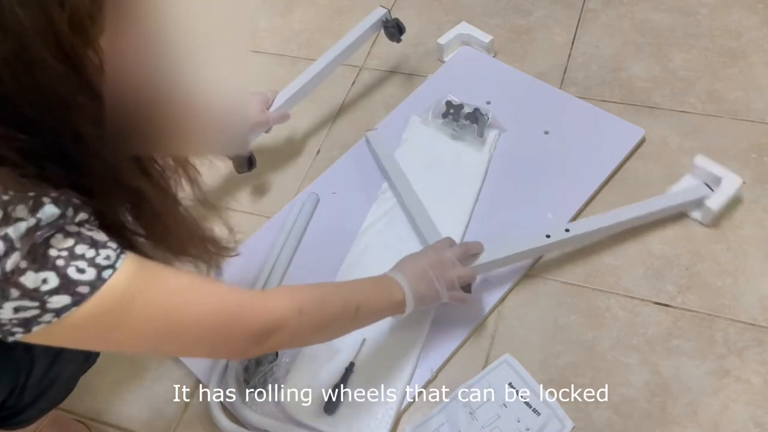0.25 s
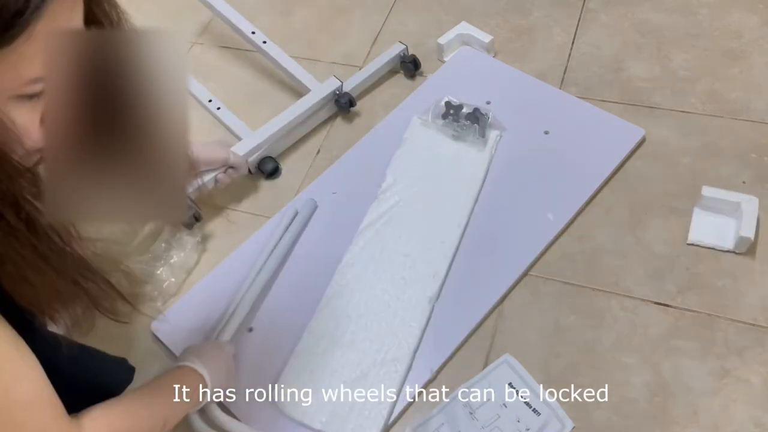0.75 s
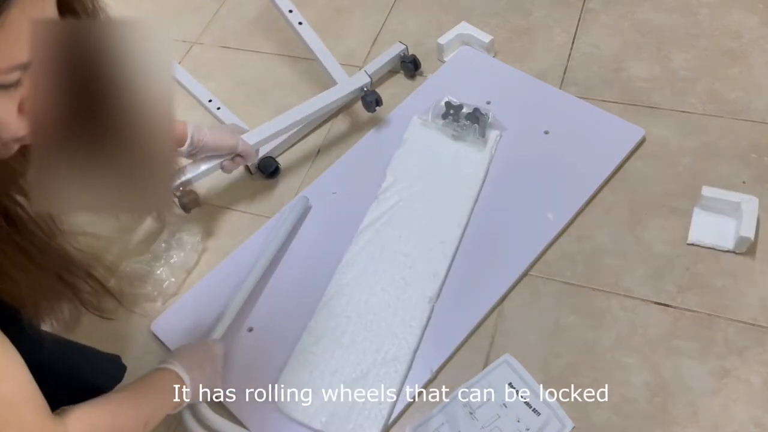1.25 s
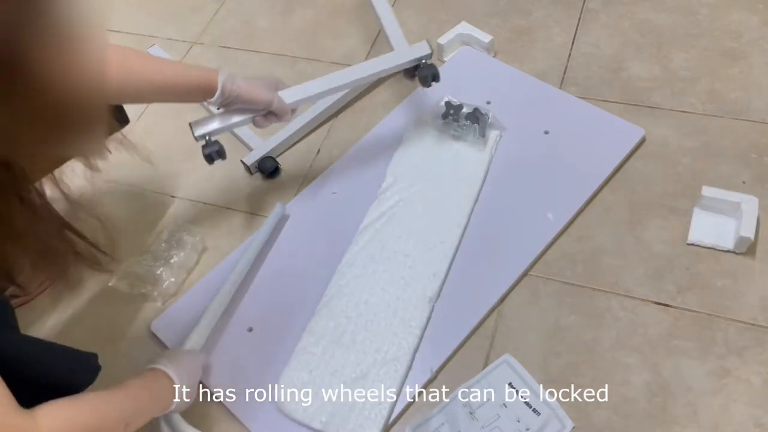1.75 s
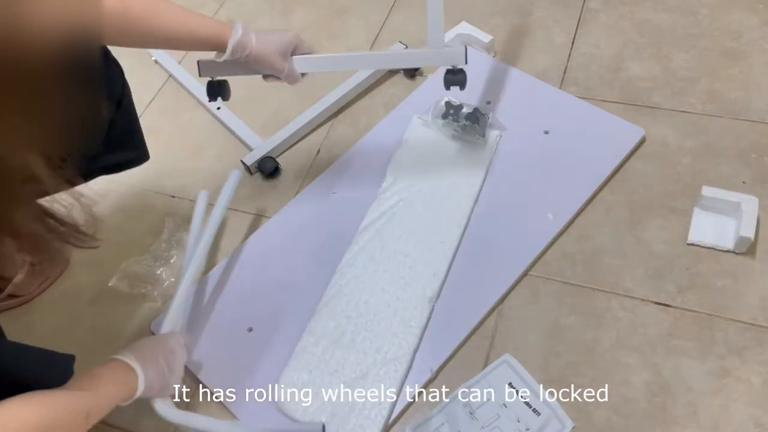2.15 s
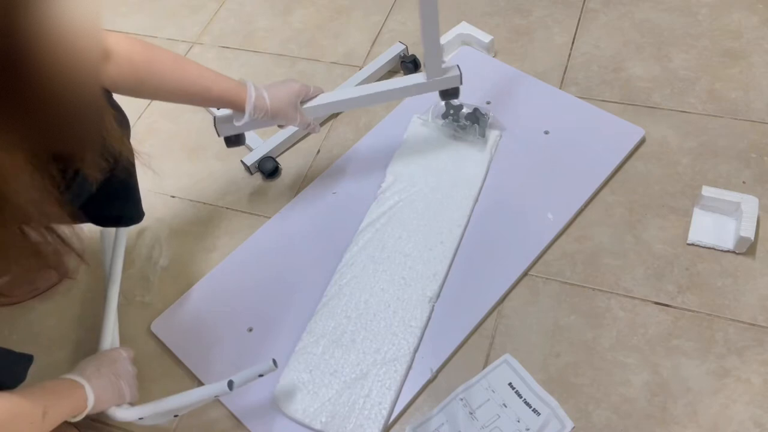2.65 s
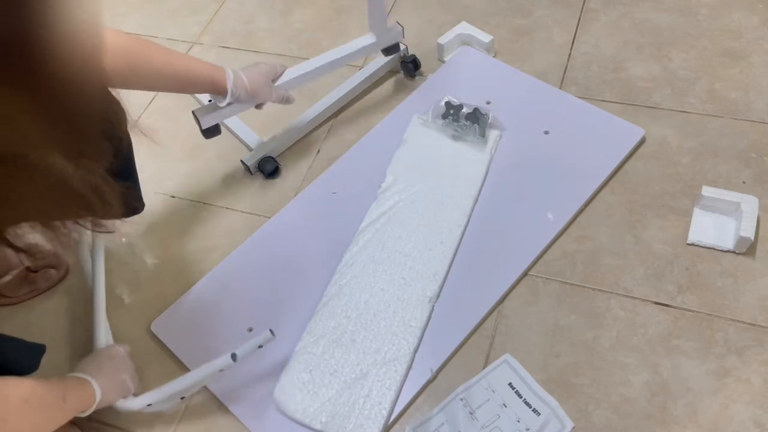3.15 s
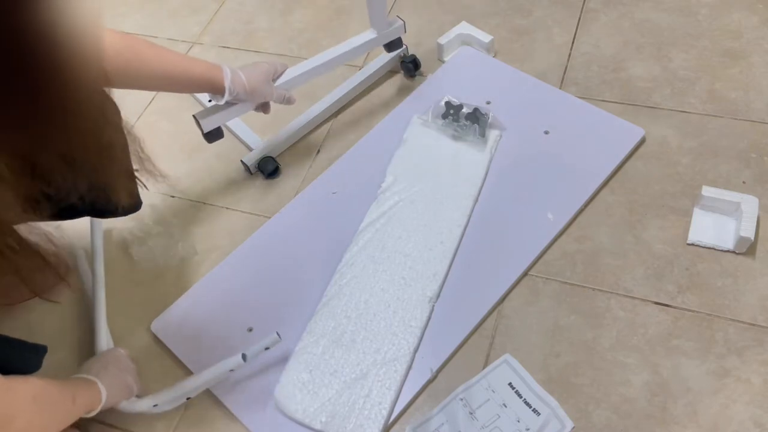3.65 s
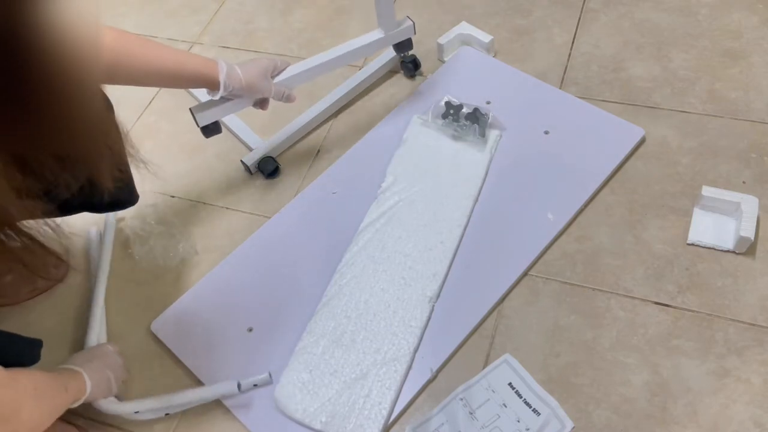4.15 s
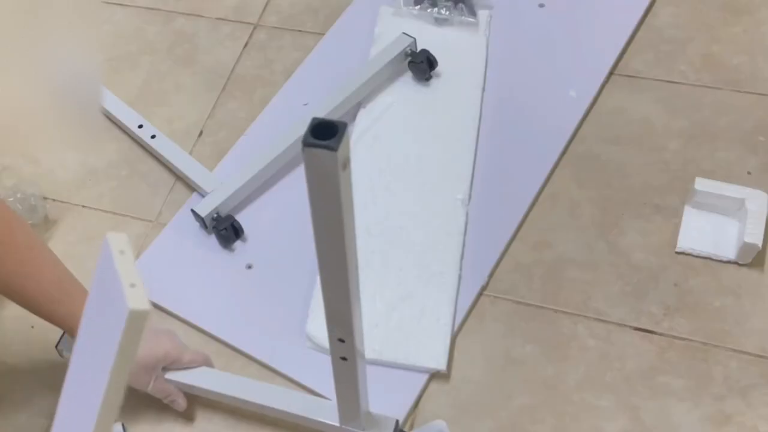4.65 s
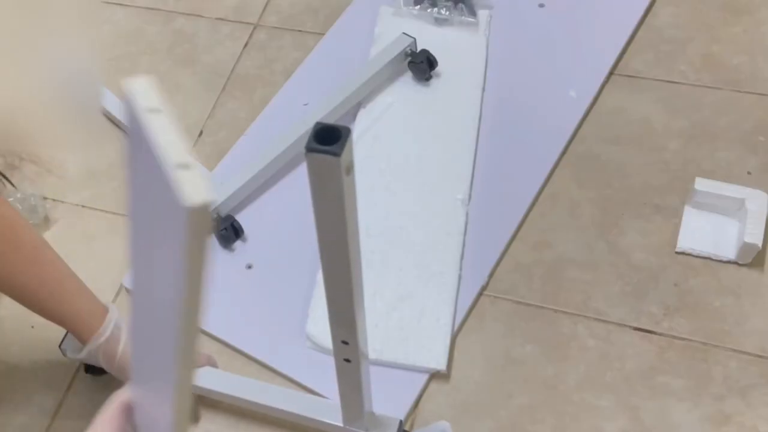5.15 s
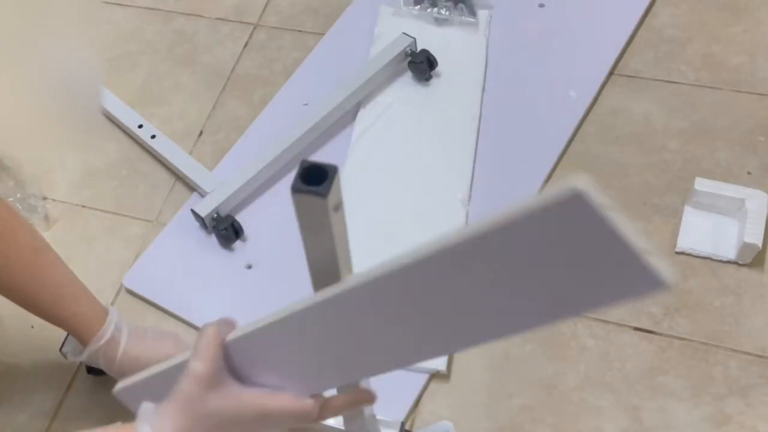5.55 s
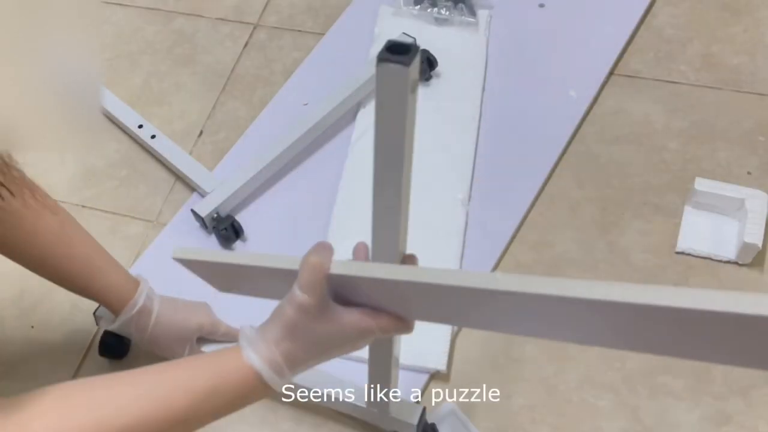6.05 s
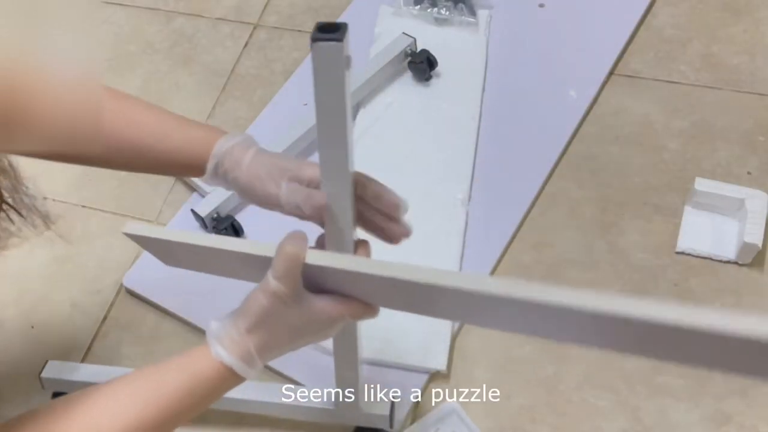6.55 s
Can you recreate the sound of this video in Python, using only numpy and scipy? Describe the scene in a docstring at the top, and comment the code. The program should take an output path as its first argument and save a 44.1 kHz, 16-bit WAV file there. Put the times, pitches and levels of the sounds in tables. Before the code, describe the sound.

In a small hard room with fan hum, gloved hands handle steel tubes that tap, drag and clang, before dull board bumps and a squeak.

```python
"""A fan, low rumble and moving air fill a small hard room while clothes stir.
Gloves slide on tubes, parts scrape the tiles, plastic casters click and bump down; a steel leg lands and sings on.
Tubes tap and drag, then a free clang bounces and breaks off in mid-ring; the room drops out and fades back.
Last, a board shifts in the grip, bumps the frame and a glove squeaks on it. Contacts and rubs are shaped noise,
tubes are decaying sines; rubs, contacts and struck tubes get a short diffuse room tail."""
import sys
import numpy as np
from scipy import signal
from scipy.fft import rfft, irfft, next_fast_len
from scipy.io import wavfile
from scipy.ndimage import map_coordinates

SR = 44100
rng = np.random.default_rng(int(sys.argv[2]) if len(sys.argv) > 2 else 0)


def waveform_to_disk(signal):
    """Save audio, clipped to [-1, 1], as 16-bit WAV at the path in sys.argv[1]."""
    frames = np.transpose(np.atleast_2d(signal))
    scaled = np.clip(frames, -1, 1) * 32767
    samples = np.round(scaled).astype(np.int16)
    wavfile.write(sys.argv[1], SR, samples)


N = 300321
CUT_S = 4.509  # the clang breaks off here


def amp(db):
    """Decibels to gain."""
    return 10 ** (np.asarray(db) / 20)


def unit(x):
    """x at rms 1."""
    return x / np.sqrt(np.mean(x ** 2) + 1e-20)


def along(points, hz):
    """Read (frequency, value) points on a log frequency axis."""
    f, v = np.transpose(points)
    return np.interp(np.log(hz + 1), np.log(f + 1), v)


def curves(rows):
    """One value per sample for each column after the time."""
    s, *cols = np.transpose(rows)
    return [np.interp(np.arange(N) / SR, s, c) for c in cols]


def wobble(rate_hz, size=N):
    """A smooth random curve through rate_hz random knots a second."""
    knots = rng.standard_normal(int(size * rate_hz / SR) + 4)
    return map_coordinates(knots, [np.arange(size) * rate_hz / SR])


# likeness of the left and right microphones: frequency_hz, likeness (1 is identical)
LIKENESS = [(60, .97), (250, .82), (640, .62), (1400, .4), (3000, .3), (5500, .55), (9000, 0), (14000, 0)]
# stereo lean: frequency_hz, left_over_right_db
STEREO_LEAN = [(100, 1.34), (600, 1), (2000, 0.51), (5000, 3.5), (9000, 0.5)]


def noise(spectrum, size, spread=1):
    """Coloured stereo noise of rms 1; a smaller spread makes the two microphones more alike."""
    m = next_fast_len(size)
    hz = np.fft.rfftfreq(m, 1 / SR)
    turn = spread * np.arccos(np.clip(along(LIKENESS, hz), -1, 1)) / 2
    mid, side = rfft(rng.standard_normal((2, m))) * [np.cos(turn), np.sin(turn)]
    lean = amp(along(STEREO_LEAN, hz) / 2)
    stereo = np.array([(mid + side) * lean, (mid - side) / lean])
    return unit(irfft(stereo * amp(along(spectrum, hz)), m)[:, :size])


def attack_rms(x, size=SR // 50):
    """Strength of the beginning of a sound."""
    return np.sqrt(np.mean(x[:, :size] ** 2) + 1e-20)


# decay of the tiled room: frequency_hz, t60_s
ROOM_DECAY = [(150, 0.26), (600, 0.47), (2000, 0.42), (5000, 0.39), (10000, 0.22), (15000, 0.23)]
WALLS_S = .016  # build-up time of the wall reflections


def in_room(x, wet_db):
    """Add a fresh diffuse tail that builds up as the walls answer, then dies at its own rate per frequency."""
    tail_noise = noise([(100, 0.0026), (10000, 0.0016)], size=SR // 2)  # almost flat
    hz, t, z = signal.stft(tail_noise, SR, nperseg=256)
    decay = amp(-60 * t / along(ROOM_DECAY, hz)[:, None])
    build_up = 1 - np.exp(-(t / WALLS_S) ** 2)
    first_echoes = 1 + .8 * np.exp(-(t / WALLS_S - 1.4) ** 2)
    tail = signal.istft(z * decay * build_up * first_echoes, SR, nperseg=256)[1]
    tail = tail / np.linalg.norm(tail[0])
    return x + amp(wet_db) * signal.fftconvolve(x, tail, axes=1)[:, :x.shape[1]]


def contact(spectrum, t60, rise_s, snap, snap_s=.005):
    """A burst of first touches (the snap), then the parts chatter against each other and die away."""
    t = np.arange(SR) / SR
    chatter = amp(3 * wobble(500, size=SR)) * amp(-60 * t / t60)
    first_touch = snap * np.exp(-(t / snap_s) ** 2)
    shape = (chatter + first_touch) * (1 - np.exp(-t / rise_s))
    x = noise(spectrum, size=SR, spread=.7) * shape
    return x / attack_rms(x)


# balance of the tube modes over frequency: frequency_hz, gain_db
MODE_BALANCE = [(650, 0.5), (1400, -0.5), (2500, 1), (3600, 2), (7000, -2), (8800, 4), (12000, 8)]


def ring(modes, t60, left_db):
    """Tube modes, each with a close twin since the section is not quite square; t60 holds at 3 kHz."""
    t = np.arange(SR) / SR
    x = np.zeros((2, SR))
    for hz, db in modes:
        apart = np.arccos(np.clip(along(LIKENESS, hz), -1, 1)) * rng.normal(0, 0.73)
        phase = 2 * np.pi * (hz * t + rng.random()) + np.array([[apart], [-apart]])
        detune_hz = rng.normal(0, .008) * hz
        twin = .5 * np.sin(phase + 2 * np.pi * (detune_hz * t + rng.random()))
        # the lean to the left fades out in the treble
        lean_db = left_db / (1 + (hz / 6000) ** 4) * np.array([[.5], [-.5]])
        life = t60 * (3000 / hz) ** .25  # high modes die sooner
        level_db = db + along(MODE_BALANCE, hz) + rng.normal(0, 2.2)
        x += (np.sin(phase) + twin) * amp(level_db - 60 * t / life) * amp(lean_db)
    return x / attack_rms(x)


def strengths(colour, db, hardness_db=0):
    """Low, middle and treble levels of a contact; hardness trades bass for treble."""
    return db + np.array(colour) + hardness_db * np.array([-1, 0, 1])


# low, middle and treble bands: from_hz, to_hz
BANDS = [(100, 1700), (1700, 6000), (6000, 15000)]


def add(track, s, sound, levels, size=SR // 50):
    """Lay a sound into the track with the opening of each band set to its level in dB."""
    start = max(round(s * SR), 0)
    for band, db in zip(BANDS, levels):
        part = signal.sosfilt(signal.butter(4, band, "band", fs=SR, output="sos"), sound)
        track[:, start:start + SR] += (amp(db) / attack_rms(part, size) * part)[:, :N - start]


# colour of the low rumble: frequency_hz, density_db
RUMBLE_COLOUR = [(12, -44), (20, -14), (43, 0.5), (59, 8), (74, 2), (97, -16.5), (113, -16.5), (130, -30),
                 (170, -57.5), (290, -120)]
RUMBLE_DB, RUMBLE_AFTER_CUT_DB = -59.5, 2  # level, and its lift after the break
SWELL_S, SWELL_HALF_WIDTH_S, SWELL_DB = 5.74, 0.19, 6.7


def rumble():
    """Deep coloured noise that swells once and lies a little higher after the break."""
    t = np.arange(N) / SR
    swell_db = SWELL_DB * np.exp(-((t - SWELL_S) / SWELL_HALF_WIDTH_S) ** 2)
    level_db = RUMBLE_DB + RUMBLE_AFTER_CUT_DB * (t > CUT_S) + swell_db
    return amp(level_db) * noise(RUMBLE_COLOUR, size=N)


# colour of the moving air: frequency_hz, density_db
AIR_COLOUR = [(60, -12), (100, 0), (160, -1), (260, 1.5), (450, -9.5), (1100, -10), (1800, -22),
              (2900, -16), (4000, -22), (5500, -36.5), (9500, -35.5), (15000, -55.5)]
AIR_DB = -61.5


def air():
    """Moving air: steady broadband noise."""
    return amp(AIR_DB) * noise(AIR_COLOUR, size=N)


# tones of the fan: pitch_hz, level_db (rms)
FAN_TONES = [(893.6, -74), (1195, -80), (2433, -85.5), (2880, -78.5)]


def fan():
    """Steady tones whose phase wanders, so each is slightly unsteady in pitch."""
    t = np.arange(N) / SR
    tones = np.zeros(N)
    for hz, db in FAN_TONES:
        tones += amp(db) * np.sqrt(2) * np.sin(2 * np.pi * hz * t + 0.57 * wobble(25))
    return tones


# colour of rustling cloth: frequency_hz, density_db
CLOTH_COLOUR = [(470, -57.5), (800, -16.5), (873, -8), (1030, -22.5), (1150, -9), (1260, -23), (2150, -6),
                (6570, -14), (9100, 6.5), (11800, -20), (13600, -35), (16000, -20)]
CLOTH_DB, CLOTH_SWING_DB, STILL_UNTIL_S = -72.5, 0.8, 5.0


def clothes():
    """Faint noise of gently swinging level, silent for a still moment after the break."""
    t = np.arange(N) / SR
    moving = (t < CUT_S) | (t > STILL_UNTIL_S)
    level_db = CLOTH_DB + CLOTH_SWING_DB * (wobble(7.3) + wobble(16))
    return moving * amp(level_db) * noise(CLOTH_COLOUR, size=N)


# colour of rubbing: frequency_hz, density_db
RUB_COLOUR = [(88, -43), (150, -9), (383, -2), (702, -0.5), (774, -1), (979, -5.5), (1450, -3),
              (1900, -9.5), (2400, -3.5), (3920, -7), (6510, -17), (9080, -5.5), (11900, -26),
              (13400, -28.5), (16000, -29)]
RUB_RELEASE_S = 0.0038


def rubs(strokes, colour):
    """Each stroke is a run of tiny catches and slips, a few of them harder; the room holds it a moment longer."""
    out = np.zeros((2, N))
    t = np.arange(SR) / SR
    for s, length, db, rise_s in strokes:
        stroke = (1 - np.exp(-t / rise_s)) * np.exp(-np.maximum(t - length, 0) / RUB_RELEASE_S)
        snags = np.maximum(wobble(600, size=SR) - 1.3, 0)  # only the highest peaks
        catches = amp(1.2 * wobble(60, size=SR)) * (1 + .9 * snags)
        sound = in_room(noise(RUB_COLOUR, size=SR) * stroke * catches, wet_db=-5.5)
        add(out, s, sound, strengths(colour, db), size=int(length * SR))
    return out


# glove strokes: start_s, length_s, level_db, rise_s
GLOVE_SWISHES = [(0, 0.028, -36, 0.00033), (.02, 0.34, -48.5, 0.0046), (1.72, 0.13, -54.5, 0.0084),
                 (2.37, 0.21, -61, 0.12), (5.004, .25, -55.5, .006), (5.08, 0.04, -49, 0.0097)]


def glove_swishes():
    """A glove slides along a tube: bright rubbing noise."""
    return rubs(GLOVE_SWISHES, colour=(-23, -11, 0))  # low_db, middle_db, treble_db


# floor strokes: start_s, length_s, level_db, rise_s
FLOOR_SCRAPES = [(.21, 0.14, -59.5, .01), (.495, .15, -50.5, 0.0025), (.66, 0.055, -58.5, .01),
                 (1.07, 0.21, -58.5, 0.013), (1.44, .15, -46, 0.1), (3.96, 0.21, -52, .004)]


def floor_scrapes():
    """Parts scrape over the floor: rubbing noise strong in the lows and treble."""
    return rubs(FLOOR_SCRAPES, colour=(0, -13, -6.5))  # low_db, middle_db, treble_db


RATTLE_FROM_S, RATTLE_TO_S, RATTLE_DB, RATTLE_SCATTER_DB = 2, 2.7, -65, 6.5


def rattle(count):
    """Fainter ticks while the leg swings in the hand: one chance moment in each equal slot."""
    slot_s = (RATTLE_TO_S - RATTLE_FROM_S) / count
    return [(RATTLE_FROM_S + slot_s * (k + rng.random()),
             rng.normal(RATTLE_DB, RATTLE_SCATTER_DB), 0) for k in range(count)]


# colour of plastic: frequency_hz, density_db
PLASTIC_COLOUR = [(120, -53), (200, 5.5), (467, -15), (550, 18), (734, -6), (2170, -1), (3540, 2.5),
                  (6080, -11), (8720, 0), (15000, -27)]
# loose casters swivel and click: start_s, level_db, hardness_db
CASTER_CLICKS = [(0.326, -56.5, 8), (2.61, -52.5, -1), (2.655, -52.5, 2.5), (2.67, -51, -2.5),
                 (2.686, -52.5, -1), (2.903, -47.5, 6.5), (2.931, -49.5, 2.5), (2.97, -50.5, 0),
                 (3.105, -53.5, 0.5), (3.554, -59, -2)]
CLICK_COLOUR = (-6.5, -7.5, 0)  # low_db, middle_db, treble_db


def caster_clicks():
    """Small hard ticks of the plastic casters: a sharp snap with hardly any chatter."""
    out = np.zeros((2, N))
    for s, db, hardness_db in list(CASTER_CLICKS) + rattle(count=5):
        tick = contact(PLASTIC_COLOUR, t60=.025, rise_s=.0002, snap=3, snap_s=.0015)
        add(out, s, in_room(tick, wet_db=-1.0), strengths(CLICK_COLOUR, db, hardness_db))
    return out


# colour of a dead bump: frequency_hz, density_db
BUMP_COLOUR = [(100, -12), (400, -7), (1100, 0), (1600, -4), (2600, -9), (3600, -15), (4500, -22),
               (7400, -22), (9000, -7), (10500, -18), (12400, -34), (15000, -60)]


def knock(hz, body_db, t60, rise_s):
    """A dead bump; the struck face sends one broad resonance straight to the microphones."""
    bump = contact(BUMP_COLOUR, t60, rise_s, snap=0.096, snap_s=0.0013)
    body = signal.lfilter(*signal.iirpeak(hz, Q=4, fs=SR), bump)
    return in_room(bump, wet_db=-5.5) + amp(body_db) * body / attack_rms(body)


# casters bump down: start_s, low_db, middle_db, treble_db, body_hz, body_over_contact_db
CASTER_BUMPS = [(1.251, -49, -61.5, -57.5, 1300, -23), (1.864, -32.5, -42.5, -28, 1120, -8),
                (1.915, -29, -34.5, -49, 1140, -1.5), (3.368, -55, -58.5, -49, 810, -10)]


def caster_knocks():
    """Wheels land on the tiles: a short bump with one broad body resonance."""
    out = np.zeros((2, N))
    for s, *levels, hz, body_db in CASTER_BUMPS:
        add(out, s, knock(hz, body_db, t60=0.047, rise_s=0.0015), levels)
    return out


# colour of steel on steel: frequency_hz, density_db
STEEL_COLOUR = [(88, -62.5), (150, -24), (1020, -16.5), (1340, -12.5), (1900, -14.5), (2400, -5.5),
                (2920, -8.5), (3550, -5.5), (4240, -22), (4490, -12), (7180, -10), (8900, 5), (10400, -9),
                (12400, -27), (16000, -46)]
# modes of the leg tube: pitch_hz, level_db
LEG_TONES = [(1104, -52), (1335, -41), (2422, -31.5), (2665, -34.5), (3176, -47), (3585, -34.5),
             (5087, -56), (5604, -69.5), (6331, -47), (7397, -36.5), (8177, -66), (8807, -60),
             (9114, -28.5), (11176, -31), (11746, -44), (12086, -59)]
# a leg is set down: start_s, low_db, middle_db, treble_db, ring_over_contact_db, contact_t60_s
LEG_HITS = [(1.544, -30, -24.5, -15, -0.5, 0.069), (1.612, -24.5, -27, -31.5, -5, 0.14),
            (1.651, -35, -33, -28, -29, 0.057)]


def leg():
    """A hand-held leg lands on the other: hard contact noise and a short ring of tube modes."""
    out = np.zeros((2, N))
    for s, *levels, ring_db, contact_t60 in LEG_HITS:
        blow = contact(STEEL_COLOUR, contact_t60, rise_s=.0007, snap=.8, snap_s=.008)
        tone = ring(LEG_TONES, t60=0.19, left_db=3)
        add(out, s, in_room(blow, wet_db=-5) + amp(ring_db) * in_room(tone, wet_db=-8.0), levels)
    return out


PING_HZ, PING_DB, PING_T60_S = 4888, -37, 1.15  # one lightly damped mode of the leg
PING_STOP_S, PING_STOP_T60_S = 2.066, 0.27  # the hand adds this damping


def singing_mode():
    """One sine sings on from the first leg blow and dies slowly until the hand damps it faster."""
    t = np.arange(N) / SR
    ringing_s = np.maximum(t - LEG_HITS[0][0], 0)  # zero, so silent, before the blow
    stopped_s = np.maximum(t - PING_STOP_S, 0)
    level_db = PING_DB - 60 * ringing_s / PING_T60_S - 60 * stopped_s / PING_STOP_T60_S
    return amp(level_db) * np.sin(2 * np.pi * PING_HZ * ringing_s)


# modes of the frame tubes: pitch_hz, level_db
FRAME_TONES = [(667.5, -48), (1346, -39), (1626, -46), (2175, -37), (2417, -34), (2638, -40), (3198, -32),
               (3575, -31), (3607, -34), (4576, -33), (4651, -34), (5335, -48), (5453, -48), (5566, -45),
               (5992, -44), (6288, -44), (6643, -41), (6740, -41), (7138, -48), (7526, -38), (7747, -45),
               (8102, -36), (8651, -41), (8796, -30), (9119, -44), (9313, -41), (9685, -44), (11386, -50),
               (11440, -51), (12112, -45)]
# tube meets tube: start_s, low_db, middle_db, treble_db, ring_over_contact_db, contact_t60_s
FRAME_HITS = [(3.247, -47.5, -40.5, -38.5, -8.5, 0.035), (3.758, -49, -42.5, -48, -7.5, 0.028),
              (4.186, -40, -39, -42.5, -8, 0.076), (4.362, -34, -21.5, -18, 7, 0.038),
              (4.392, -25.5, -17.5, -16.5, 2.5, 0.0445), (4.415, -38.5, -28, -21, -3, .09),
              (4.461, -37, -29.5, -25.5, -4, .1)]
HELD_T60_S, FREE_T60_S, LET_GO_S = 0.13, .38, 4.3  # ring in the hand and let go (at 3 kHz), moment of release
# a glancing blow chatters long and builds up slowly; a square one is abrupt
GLANCE_T60_S, GLANCE_RISE_S = 0.048, 0.0044


def frame():
    """Light taps of hand-held tube on tube, then a free clang that bounces and rings longer."""
    out = np.zeros((2, N))
    for s, *levels, ring_db, contact_t60 in FRAME_HITS:
        rise_s = GLANCE_RISE_S * (contact_t60 / GLANCE_T60_S) ** 2
        blow = contact(STEEL_COLOUR, contact_t60, rise_s, snap=0.34)
        tone = ring(FRAME_TONES, HELD_T60_S if s < LET_GO_S else FREE_T60_S, left_db=6.5)
        add(out, s, in_room(blow, wet_db=-4) + amp(ring_db) * in_room(tone, wet_db=-8.0), levels)
    return out


# one tube drags along the other before it slips: time_s, level_db
DRAG_CURVE = [(3.88, -58), (3.97, -52), (4.08, -53), (4.17, -60), (4.25, -73)]


def drag():
    """Friction noise keeps the modes of the frame faintly ringing while a tube slides."""
    t = np.arange(N) / SR
    touching = (t > DRAG_CURVE[0][0]) & (t < DRAG_CURVE[-1][0])
    modes = ring(FRAME_TONES, t60=0.053, left_db=6.5)
    friction = signal.lfilter(*signal.butter(1, 3000, fs=SR), rng.standard_normal((1, N)))
    ringing = unit(signal.fftconvolve(friction, modes, axes=1)[:, :N])
    return amp(curves(DRAG_CURVE)[0]) * touching * ringing


# the board shifts in the grip: start_s, length_s, level_db, rise_s
BOARD_SHIFTS = [(5.67, .23, -62.5, 0.014), (6.487, 0.21, -56, 0.003)]


def board_shifts():
    """The board shifts in the grip: rubbing noise strongest in the middle."""
    return rubs(BOARD_SHIFTS, colour=(-5.5, 0, -4))  # low_db, middle_db, treble_db


# the board bumps the frame: start_s, level_db, hardness_db, body_hz, body_over_contact_db, contact_t60_s
BOARD_BUMPS = [(5.723, -43.5, 1, 2260, -1, .012), (6.136, -47, -3.5, 2413, -9, 0.11),
               (6.322, -60, -2, 2200, -12, 0.028), (6.477, -44.5, 16.5, 2400, -8, 0.02),
               (6.519, -50.5, 7, 1614, -15, 0.034), (6.589, -40.5, 2, 2820, -16, 0.069),
               (6.63, -41.5, -5.5, 1310, -15, 0.029)]
BOARD_COLOUR = (-10, 0, -21.5)  # low_db, middle_db, treble_db


def board_knocks():
    """The board bumps the frame: abrupt knocks, each with its own body resonance and hardness."""
    out = np.zeros((2, N))
    for s, db, hardness_db, hz, body_db, t60 in BOARD_BUMPS:
        add(out, s, knock(hz, body_db, t60, rise_s=0.00098), strengths(BOARD_COLOUR, db, hardness_db))
    return out


# a glove squeaks on the board: time_s, pitch_hz, level_db (less the gain of the quietest row)
SQUEAK_CURVE = [(6.36, 2700, -80), (6.41, 2630, -65), (6.47, 2570, -61), (6.52, 2530, -61),
                (6.56, 2500, -80)]


def glove_squeak():
    """A glove slips on the board: one falling sine with a quickly wavering pitch."""
    t = np.arange(N) / SR
    hz, db = curves(SQUEAK_CURVE)
    gain = amp(db) - amp(db.min())  # starts and ends at silence
    wavering_hz = hz * (1 + 0.035 * wobble(180))
    slipping = (t > SQUEAK_CURVE[0][0]) & (t < SQUEAK_CURVE[-1][0])
    return gain * slipping * np.sin(2 * np.pi * np.cumsum(wavering_hz) / SR)


def scene():
    """All sources; the clang stops dead, the background drops out with it and soon fades back in."""
    t = np.arange(N) / SR
    before = np.clip((CUT_S - t) / .002 + 1, 0, 1)
    after = np.clip((t - CUT_S - .015) / 0.013, 0, 1)
    background = rumble() + air() + fan() + clothes() + glove_squeak()
    rubbing = glove_swishes() + floor_scrapes() + board_shifts() + drag()
    hits = caster_clicks() + caster_knocks() + leg() + singing_mode() + board_knocks()
    return (before + after) * background + rubbing + hits + before * frame()


# gain over the highest treble: frequency_hz, gain_db
TREBLE_GAIN = [(10000, -0.5), (10700, -8.5), (12300, 2.5), (13000, -9.5), (16000, -9.5)]
TOP_HZ = 16200  # band limit


def record(dry):
    """Shape the highest treble; nothing is kept above the band limit."""
    m = next_fast_len(N + SR // 2)
    hz = np.fft.rfftfreq(m, 1 / SR)
    return irfft(rfft(dry, m) * amp(along(TREBLE_GAIN, hz)) * (hz < TOP_HZ), m)[:, :N]


dry = scene()
out = record(dry)
waveform_to_disk(out)
```